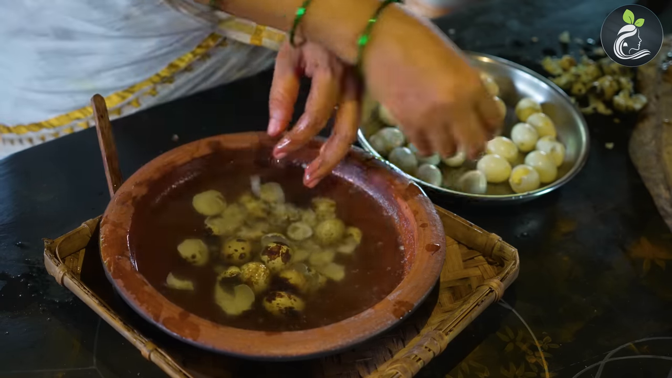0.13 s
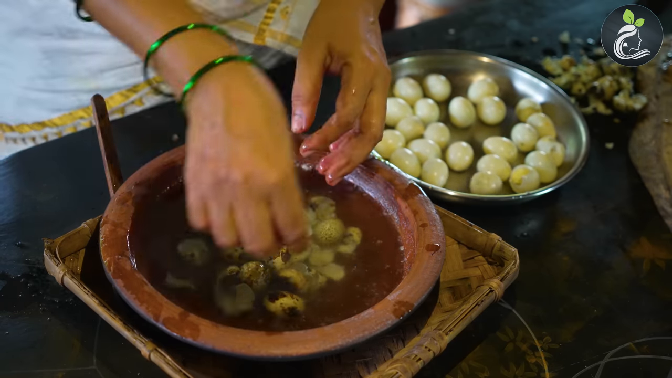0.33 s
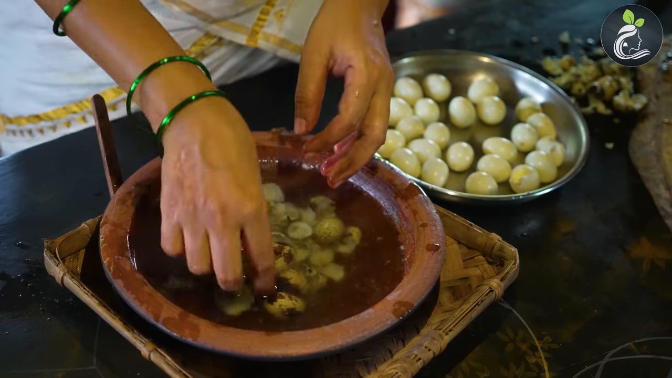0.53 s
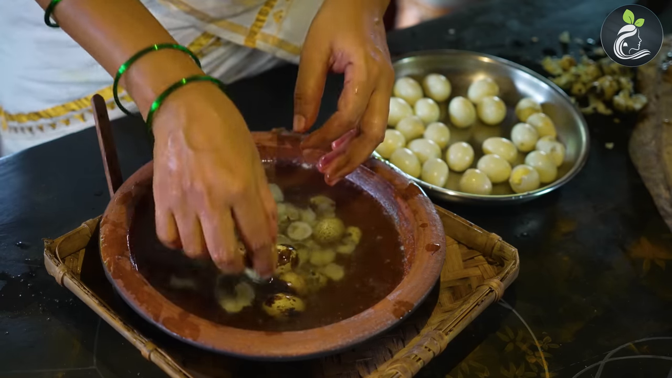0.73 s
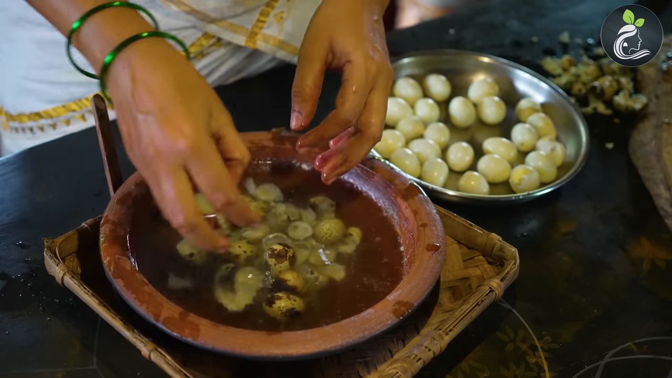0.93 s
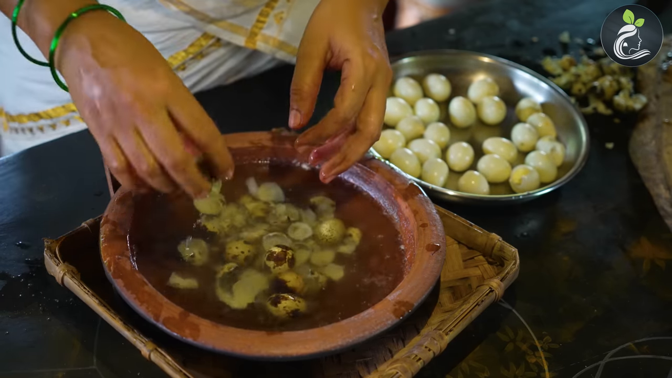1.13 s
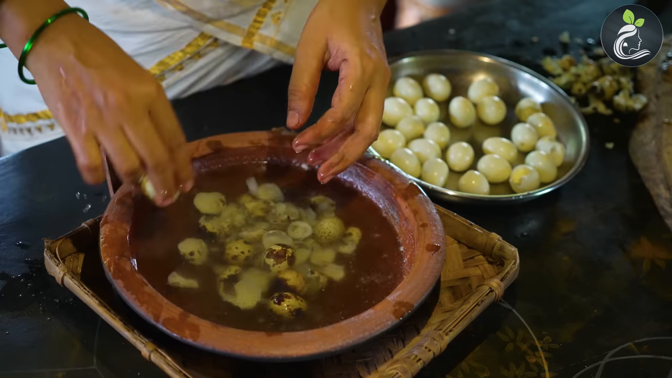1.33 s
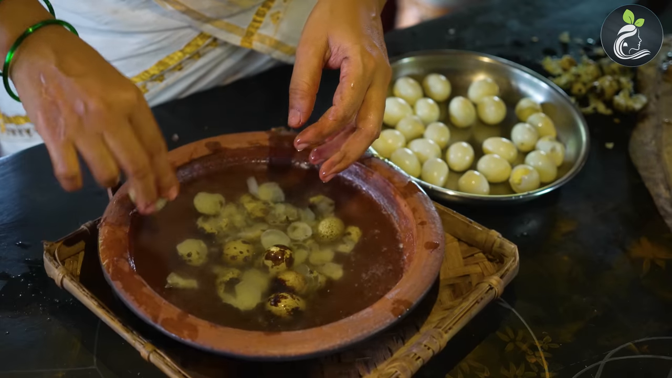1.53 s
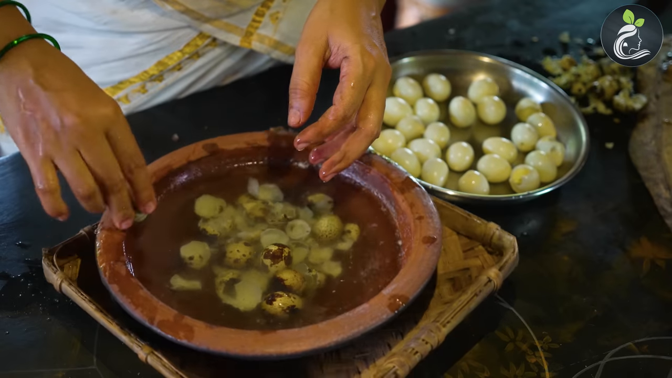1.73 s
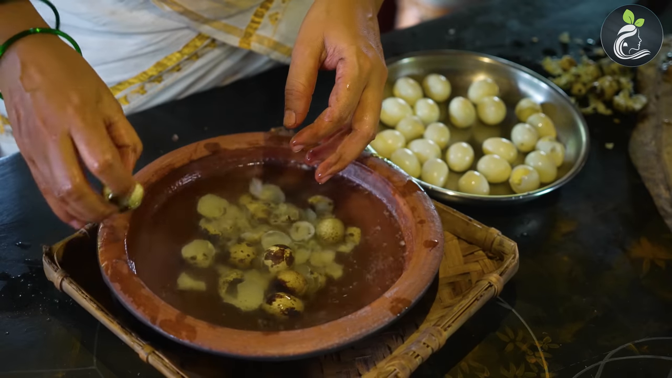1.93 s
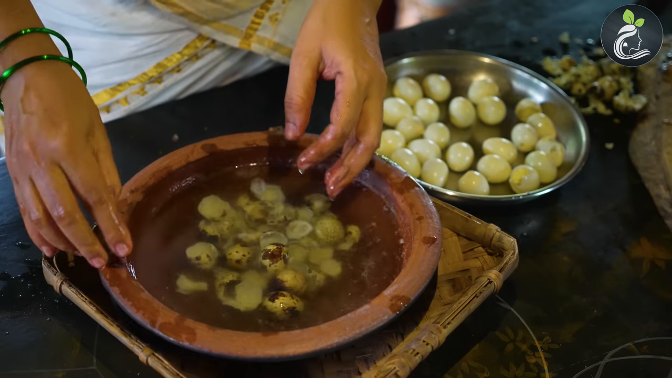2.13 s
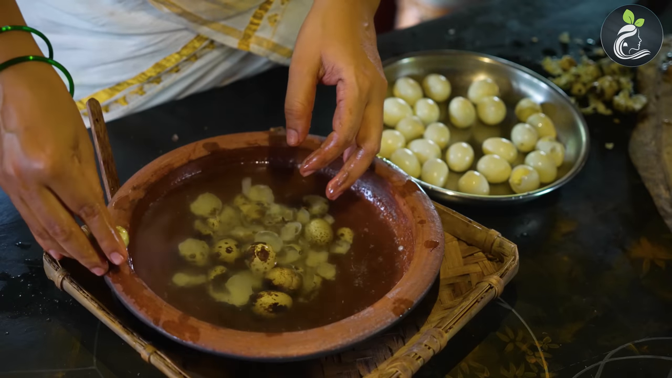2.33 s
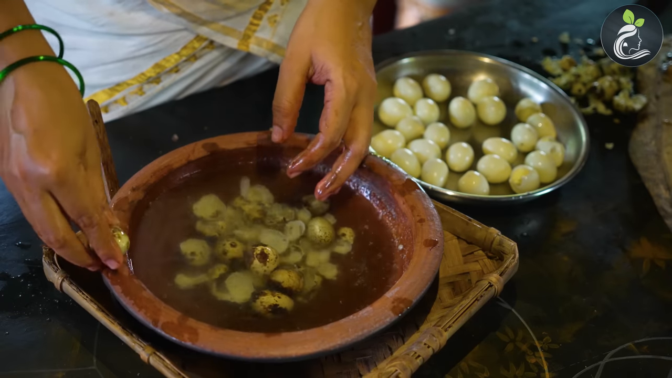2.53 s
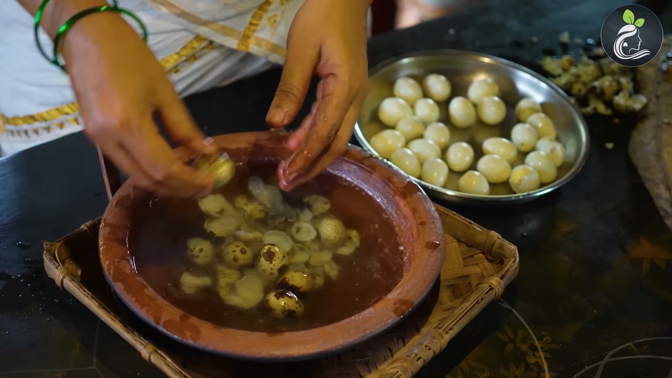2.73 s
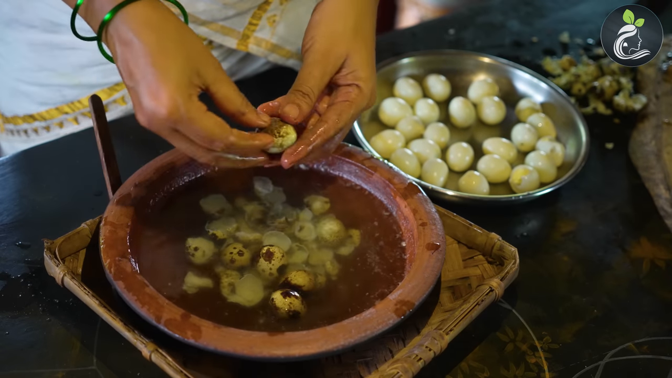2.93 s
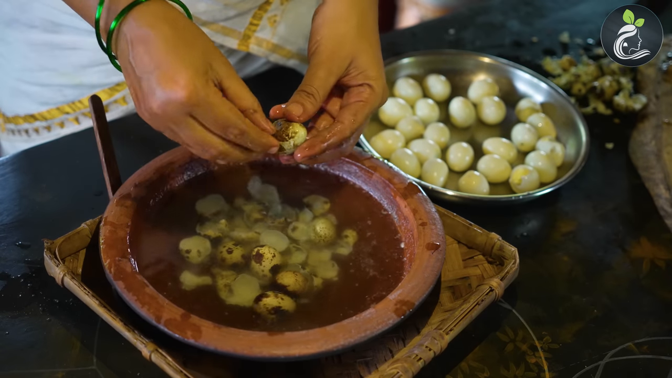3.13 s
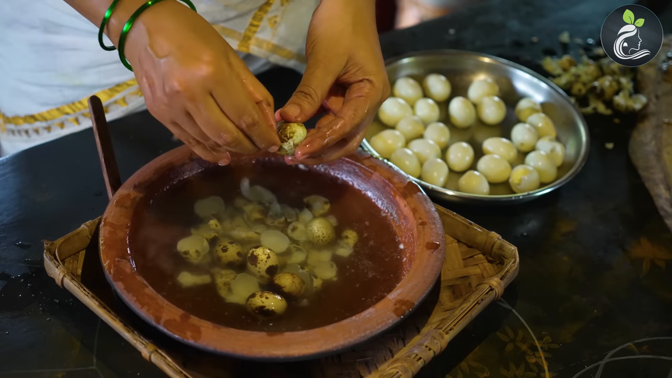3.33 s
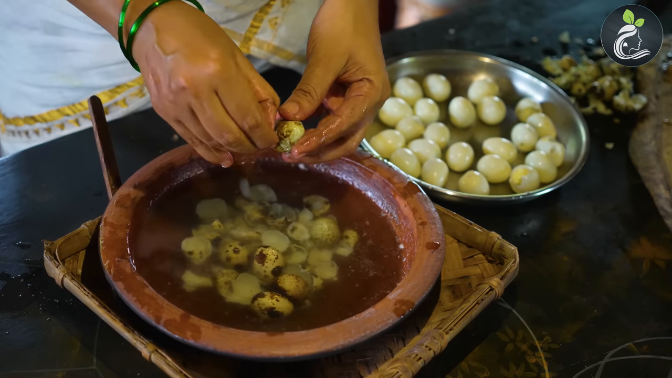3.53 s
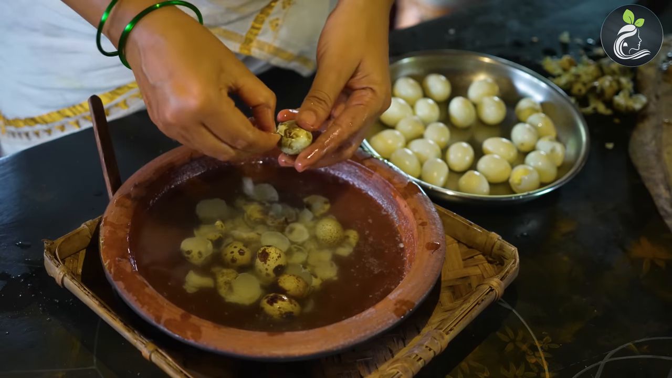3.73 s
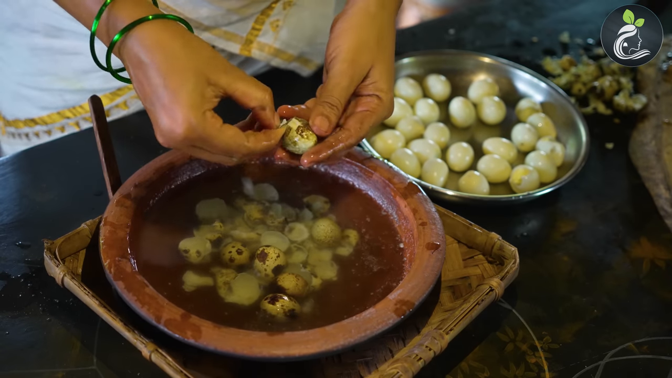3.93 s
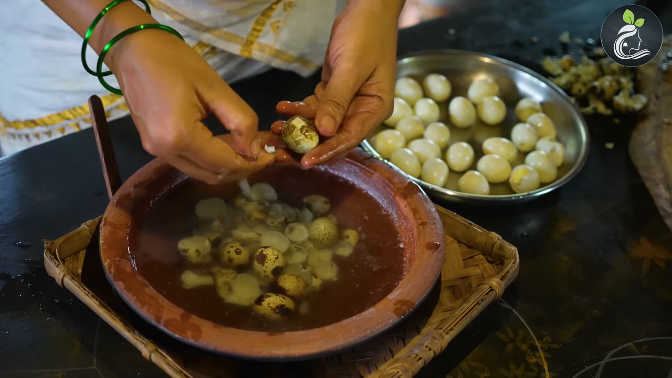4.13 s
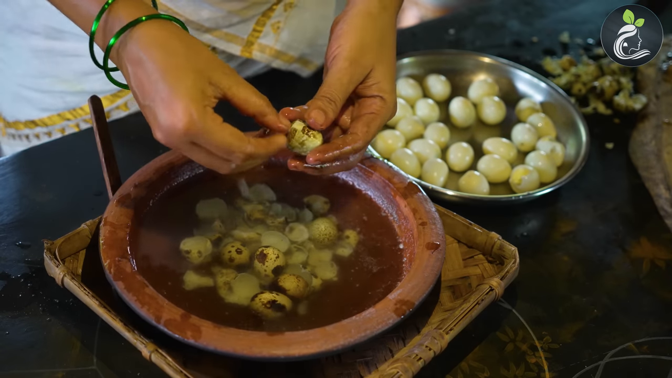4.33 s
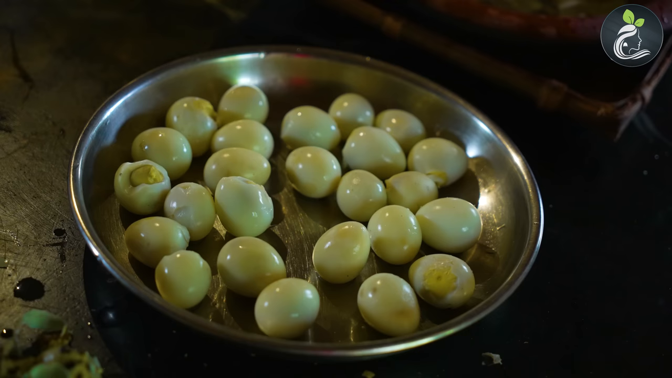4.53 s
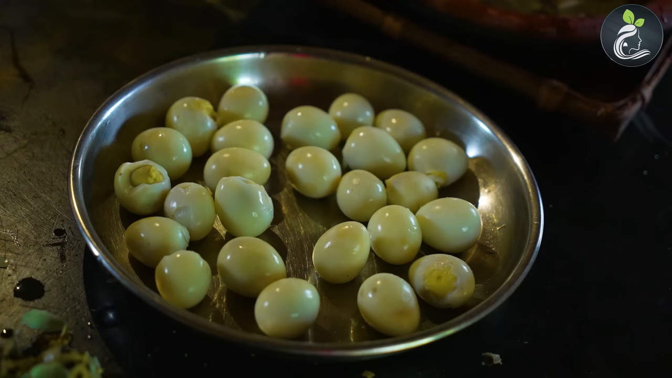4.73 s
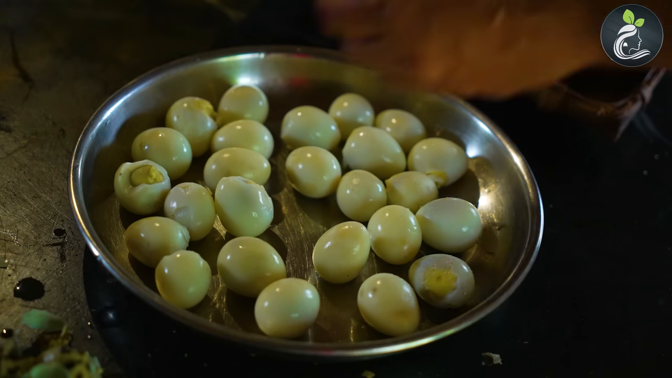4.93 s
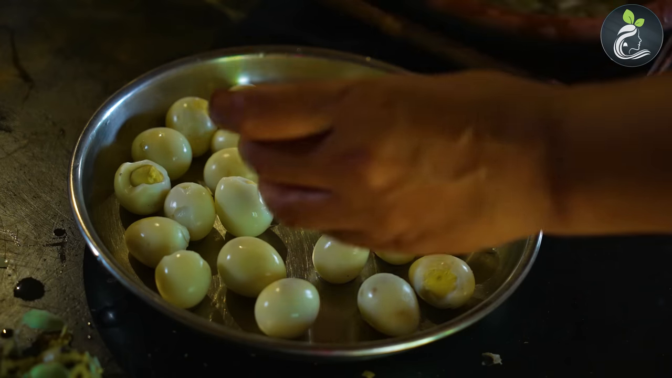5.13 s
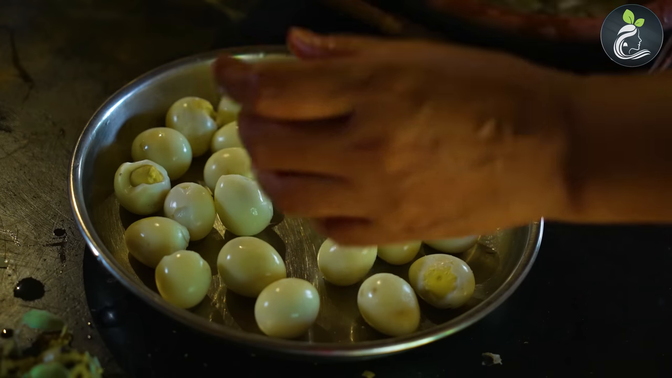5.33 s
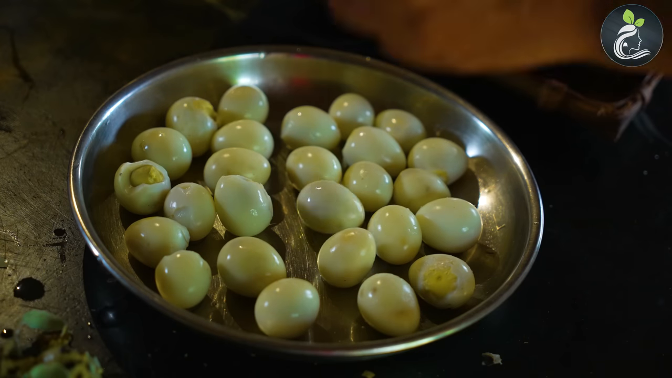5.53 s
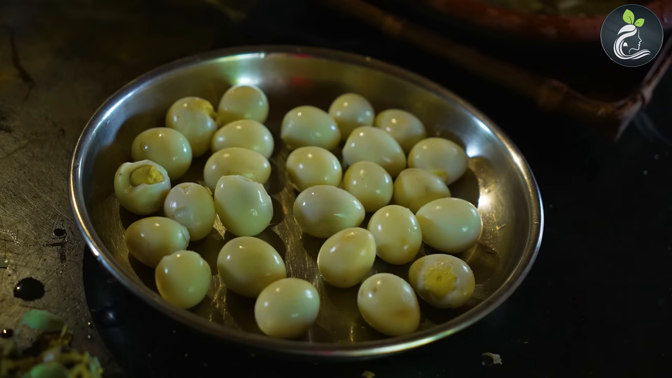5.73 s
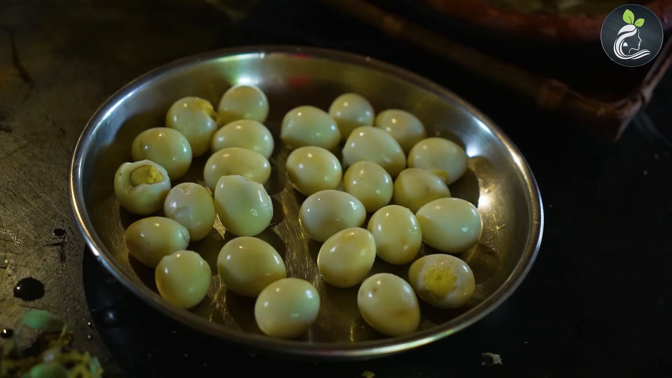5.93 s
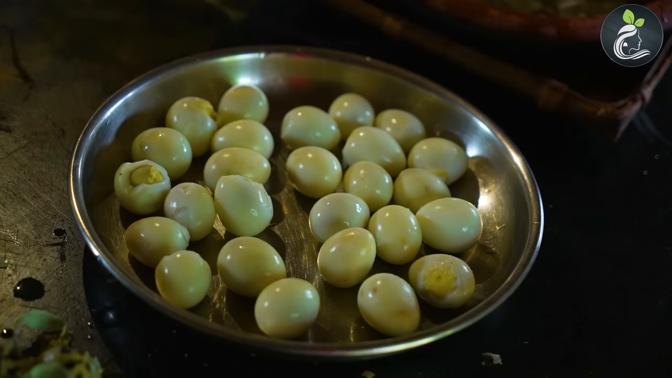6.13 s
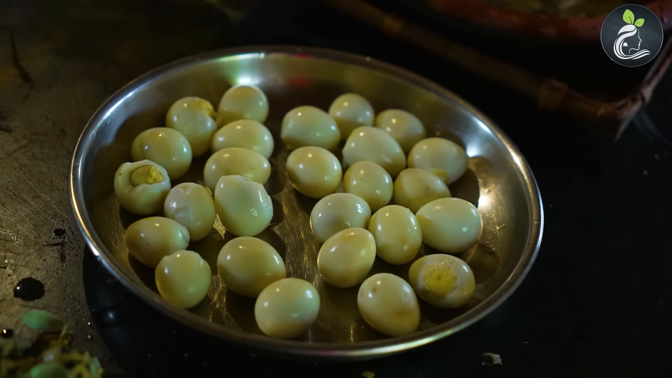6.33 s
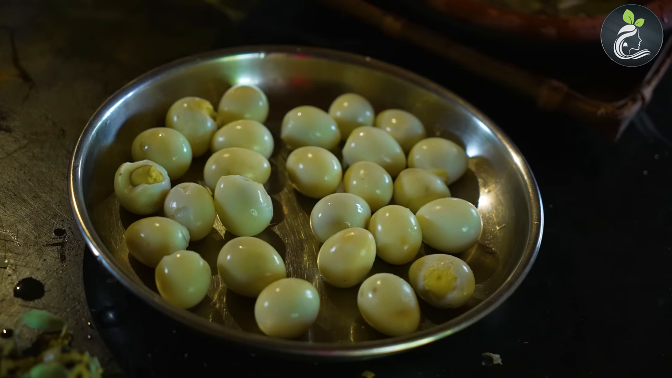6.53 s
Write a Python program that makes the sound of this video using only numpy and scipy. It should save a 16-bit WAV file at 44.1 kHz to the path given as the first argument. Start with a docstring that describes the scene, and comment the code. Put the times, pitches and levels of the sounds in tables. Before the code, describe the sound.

Close by in a kitchen, a small boiled egg knocks against a clay pot under water, then is tapped sharply on the rim four times and rolled until the shell crunches. Bits of shell tick and crumble, and glass bangles clink once. Then wet fingers squelch softly, setting eggs on a plate, and a few drops fall. Faint birds call outside over a steady hush.

```python
"""Boiled eggs are peeled by hand over a clay pot of water, with a steady hush and birds calling outside.
Wet fingers slide, bits of shell snap and crumble, and an egg knocks on the pot under water.
It gets four clear taps and two faint ones on the rim, each cracking shell and ringing the clay,
and is rolled until the shell gives way. A crow caws, more shell breaks and glass bangles touch once.
From about 4.5 s the hush is thinner; wet fingers squelch as they set eggs on a plate, and water drips."""
import sys
import numpy as np
from scipy import signal
from scipy.fft import rfft, irfft, next_fast_len
from scipy.io import wavfile

SR = 44100
rng = np.random.default_rng(int(sys.argv[2]) if len(sys.argv) > 2 else 0)


def unload_wav(signal):
    """Save mono or channel-first audio to the path in sys.argv[1] as 16-bit WAV at rate SR, clipped to [-1, 1]."""
    wavfile.write(
        sys.argv[1],
        SR,
        np.round(np.clip(np.atleast_2d(signal).T, -1, 1) * 32767).astype(np.int16),
    )


N = 291058
TIME = np.arange(N) / SR
AGE = TIME[:SR // 2]   # seconds since the start of one short sound


def from_db(db):
    """Turn decibels into a number to multiply a sound by."""
    return 10 ** (np.asarray(db) / 20)


def rms_one(x):
    """Scale a sound so that its average power is one."""
    return x / np.sqrt(np.mean(x ** 2) + 1e-20)


def at_hz(points, hz):
    """Read between the rows of a table of frequencies, giving each octave equal room."""
    row_hz, values = np.transpose(points)
    return np.interp(np.log(hz), np.log(row_hz), values)


def add(out, s, sound):
    """Mix a sound in, starting at s seconds."""
    start = round(s * SR)
    out[:, start:start + sound.shape[-1]] += sound[..., :N - start]


def pan(right_db):
    """Make the right ear right_db louder than the left."""
    return from_db([[-right_db / 2], [right_db / 2]])


def burst(rise_s, fade_s):
    """Loudness that climbs in a straight line, then dies away."""
    return np.minimum(AGE / rise_s, 1) * np.exp(-np.maximum(AGE - rise_s, 0) / fade_s)


def stereo_noise(colour_db, size=len(AGE), lag_s=0, mono_below_hz=220):
    """Noise shaped by colour_db(hz). The ears share the bass, not the treble; the right is lag_s late."""
    # how alike the two ears sound: f/Hz, likeness (1 = the same)
    likeness = [(300, 0.95), (600, 0.67), (1200, 0.37), (2500, 0.4), (5000, 0.21), (9000, 0)]
    padded = next_fast_len(size)
    hz = np.maximum(np.fft.rfftfreq(padded, 1 / SR), 1)
    middle, side = rfft(rng.standard_normal((2, padded)))
    alike = at_hz(likeness, hz)
    side = side * hz ** 2 / (hz ** 2 + mono_below_hz ** 2)
    ears = np.sqrt(1 + alike) * middle + np.sqrt(1 - alike) * side * [[1], [-1]]
    ears[1] *= np.exp(-2j * np.pi * hz * lag_s)
    return rms_one(irfft(ears * from_db(colour_db(hz)), padded)[:, :size])


def echoes(x, wet_db, t60, gap_s):
    """Add a wash of echoes after a short gap. Here and below, t60 is the seconds taken to fade 60 dB."""
    tail = rng.standard_normal((2, len(AGE))) * from_db(-60 * AGE / t60) * (AGE > gap_s)
    tail /= np.sqrt(np.sum(tail ** 2, axis=1, keepdims=True))
    return x + from_db(wet_db) * signal.fftconvolve(x, tail, axes=1)[:, :N]


def air(colour, peaks, swell_curve, lag_s, swell_depth=1.8):
    """Outdoor air: noise with a few narrow peaks, whose low-middle pitches swell and ebb."""
    def colour_db(hz):
        humps = sum(db * np.exp(-((hz - centre) / width) ** 2) for centre, width, db in peaks)
        return at_hz(colour, hz) + humps
    noise = stereo_noise(colour_db, N, lag_s)
    s, db = np.transpose(swell_curve)
    swell = from_db(swell_depth * np.interp(TIME, s, db - db.mean()))
    low_mids = signal.sosfilt(signal.butter(1, [270, 650], "band", fs=SR, output="sos"), noise)
    return noise + (swell - 1) * low_mids


def hush(move_s=4.495, level_db=-47.5):
    """The steady background; it turns thinner at move_s, when the work moves from pot to plate."""
    # tone colour of the air in each place: f/Hz, level/dB
    pot_colour = [(25, -21), (55, -6.5), (110, -12.5), (300, -13), (420, -4.5), (700, -2.5), (1300, 0),
                  (2200, -3), (3500, -4.5), (6000, -8), (9000, -5), (10800, -12.5), (16000, -15)]
    plate_colour = [(25, -22), (55, -12), (90, -6), (160, -21), (330, -24), (600, -11), (1100, -10),
                    (1800, -3.5), (2400, -8.5), (4500, -13), (8700, -10), (11000, -14), (16000, -16)]
    # narrow resonances by the pot: f/Hz, width/Hz, boost/dB
    pot_peaks = [(275, 24, 6.5), (967, 60, 3), (1447, 22, 6)]
    # shape of the swell in each place, which air() centres and deepens: t/s, level/dB
    pot_swell = [(0.0, -64), (0.49, -66.5), (3.39, -64.5), (4.3, -63.5)]
    plate_swell = [(4.9, -69), (6.6, -67)]
    hiss = [(8600, 800, 4)]   # one more peak, high up
    by_pot = air(pot_colour, pot_peaks + hiss, pot_swell, lag_s=0.00012) * pan(right_db=-1)
    by_plate = air(plate_colour, hiss, plate_swell, lag_s=0.00005) * pan(right_db=1.2)
    return from_db(level_db) * np.where(TIME < move_s, by_pot, by_plate)


def grain(spread_db, size=len(AGE), step=12):
    """The uneven strengths of tiny breaks, a new one every step samples."""
    strengths = from_db(spread_db * np.clip(rng.standard_normal(size // step + 2), -3, 2.5))
    return rms_one(np.interp(np.arange(size) / step, np.arange(len(strengths)), strengths))


def flakes(tilt_db, grain_db=2.5, size=len(AGE)):
    """A cluster of tiny breaks or wet clicks, made brighter by tilt_db per octave."""
    # tone colour before the tilt: f/Hz, level/dB
    colour = [(400, -20), (900, 4.5), (2000, -2), (4000, -0.5), (7000, 2.5), (11000, 2), (15500, -5.5)]
    noise = stereo_noise(lambda hz: at_hz(colour, hz) + tilt_db * np.log2(hz / 7000), size)
    return noise * grain(grain_db, size)


def slides():
    """Wet eggs and fingers slide, with a fine fizz that swells and ebbs with their speed."""
    # sliding strokes: t/s, length/s, level/dB, tilt/(dB per octave)
    strokes = [(0.015, 0.044, -50, 0.5), (0.502, 0.085, -48, -1.5), (4.479, 0.12, -50.5, 1.5),
               (5.38, 0.78, -49.5, -0.5), (5.642, 0.14, -50, 11)]
    out = np.zeros((2, N))
    for s, length, db, tilt_db in strokes:
        speed = np.sin(np.linspace(0, np.pi, round(length * SR)))
        add(out, s, from_db(db) * speed * flakes(tilt_db, grain_db=3, size=len(speed)))
    return out


def glide(hz, octaves, length):
    """A pitch that slides evenly through hz."""
    return hz * 2 ** (octaves * np.linspace(-0.5, 0.5, round(length * SR)))


def arch(hz, length, scoop, droop, scoop_s=0.0251, quaver_octaves=0.0145, quaver_per_s=22):
    """A pitch that scoops up to hz, wobbles there and droops at the end; scoop and droop are octaves."""
    age = TIME[:round(length * SR)]
    wobble = np.interp(age * quaver_per_s, np.arange(len(AGE)), rng.standard_normal(len(AGE)))
    octaves = quaver_octaves * wobble - scoop * np.exp(-age / scoop_s) - droop * (age / length) ** 6
    return hz * 2 ** octaves


def bird_note(pitch, hoarse_hz, clear, peak_at):
    """One note that swells and fades: a clear whistle plus a random shake that makes it hoarse."""
    progress = np.linspace(0, 1, len(pitch))
    phase = 2 * np.pi * np.cumsum(pitch) / SR
    noise = rng.standard_normal((2, len(AGE)))
    shake = signal.sosfilt(signal.butter(2, hoarse_hz, fs=SR, output="sos"), noise)
    shake = rms_one(shake)[:, -len(pitch):]
    tone = (clear + shake[0]) * np.cos(phase) + shake[1] * np.sin(phase)
    return rms_one(tone * progress ** peak_at * (1 - progress) ** (1 - peak_at))


def chirps(chatter_from_s=4.6, chatter_to_s=6.0, chatter_hz=3090):
    """Birds give short gliding chirps; later, small ones farther off chatter at random."""
    # single chirps: t/s, length/s, middle f/Hz, glide/octaves, relative level/dB
    notes = [(.125, .035, 3070, .08, -58), (0.652, 0.053, 2670, -.28, -50.5), (0.724, .055, 2480, .25, -55),
             (1.93, 0.04, 2760, -0.22, -50.5), (2.504, 0.055, 2406, 0.25, -47),
             (3.026, 0.056, 1874, 0.32, -52.5), (3.745, 0.07, 4140, 0.061, -60),
             (4.273, .07, 4130, -0.024, -64), (4.51, .06, 6750, .08, -55), (5.19, 0.06, 4040, 0.015, -58.5),
             (5.55, 0.054, 3100, .25, -58), (5.82, .06, 3270, .14, -57)]
    chatter = []
    for _ in range(12):
        s = rng.uniform(chatter_from_s, chatter_to_s)
        offset, octaves = rng.uniform(-0.25, 0.25, 2)
        chatter.append((s, 0.05, chatter_hz * 2 ** offset, octaves, -62))
    out = np.zeros((2, N))
    for s, length, hz, octaves, db in notes + chatter:
        pitch = glide(hz, octaves, length)
        add(out, s, from_db(db) * bird_note(pitch, hoarse_hz=45, clear=1.6, peak_at=0.6))
    return out


def ticks():
    """Very short, bright ticks: shell flakes snapping, and at 3.6 s the click of bangles touching."""
    # ticks of shell or glass: t/s, level/dB
    clicks = [(0.192, -33), (1.969, -34), (2.866, -31), (3.1875, -29), (3.601, -28), (3.9325, -33),
              (3.974, -24.5), (4.888, -36)]
    out = np.zeros((2, N))
    for s, db in clicks:
        bright = stereo_noise(lambda hz: 6.5 * np.log2(hz))
        add(out, s, from_db(db) * bright * burst(rise_s=0.0002, fade_s=0.0005))
    return echoes(out, wet_db=-9, t60=0.08, gap_s=0.002) * pan(right_db=-10)


def crumbles():
    """A patch of shell crumbles between the fingers in many tiny breaks."""
    # crumbling patches: t/s, level/dB
    patches = [(0.383, -39.5), (3.548, -37)]
    out = np.zeros((2, N))
    for s, db in patches:
        add(out, s, from_db(db) * flakes(tilt_db=3) * burst(rise_s=0.012, fade_s=0.024))
    return out * pan(right_db=3.5)


def noise_band(centre_hz, octaves):
    """Noise in a band around one pitch."""
    low_hz, high_hz = centre_hz / 2 ** (octaves / 2), centre_hz * 2 ** (octaves / 2)
    return stereo_noise(lambda hz: -10 * np.log10((1 + (low_hz / hz) ** 8) * (1 + (hz / high_hz) ** 6)))


def bumps():
    """Hand, water and pot meet softly in short, dull thuds; deeper ones last longer."""
    # soft contacts: t/s, level/dB, centre f/Hz, width/octaves
    contacts = [(0.539, -52, 300, 2), (0.9332, -40, 410, 2.4), (.933, -45, 1400, 2.8),
                (0.94, -42.5, 58, 2.9), (1.846, -49.5, 121, 0.72), (1.88, -48.5, 62, 1.6),
                (2.589, -43, 300, 2.4), (2.745, -49, 250, 2.3), (3.235, -56.5, 110, 2.9)]
    out = np.zeros((2, N))
    for s, db, hz, octaves in contacts:
        fade_s = 0.03 * (300 / hz) ** 0.17
        add(out, s, from_db(db) * noise_band(hz, octaves) * burst(0.00092, fade_s))
    return out


def ring(tones, ear_spread, rise_cycles=2.6):
    """A struck object's own tones build up and fade, out of step at the ears by +-ear_spread radians."""
    out = 0
    for hz, db, t60 in tones:
        phase = rng.uniform(0, 2 * np.pi) + ear_spread * rng.choice([-1, 1]) * np.array([[1], [-1]])
        loudness = from_db(db - 60 * AGE / t60) * np.minimum(AGE * hz / rise_cycles, 1)
        out = out + loudness * np.sin(2 * np.pi * hz * AGE + phase)
    return out


def strikes(blows, tones, ear_spread):
    """Light blows set one object ringing."""
    out = np.zeros((2, N))
    for s, db in blows:
        add(out, s, from_db(db) * ring(tones, ear_spread))
    return echoes(out, wet_db=-14, t60=0.16, gap_s=0.0041)


def underwater_knocks():
    """An egg knocks against the pot under water as it is fished out."""
    # knocks: t/s, level/dB
    blows = [(.5613, -29), (.5722, -31)]
    # tones they ring: f/Hz, relative level/dB, t60/s
    tones = [(1184, -10, 0.092), (1320, -0.5, 0.054), (1390, 2.5, 0.025), (1630, -11, 0.067),
             (1735, -9.5, 0.077), (2294, -11, 0.07)]
    return strikes(blows, tones, ear_spread=0.3)


def squawks():
    """A bird squawks: a hoarse falling note with a wider rasp around it."""
    # squawks: t/s, middle f/Hz, relative level/dB
    notes = [(1.107, 2910, -58.5), (2.145, 2677, -46), (6.51, 2757, -57)]
    out = np.zeros((2, N))
    for s, hz, db in notes:
        pitch = glide(hz, octaves=-0.1004, length=0.095)
        add(out, s, from_db(db) * bird_note(pitch, hoarse_hz=130, clear=0.98, peak_at=0.52))
        add(out, s, from_db(db + 2.5) * bird_note(pitch, hoarse_hz=750, clear=0, peak_at=0.36))
    return out


def egg_on_rim(tap_crush_s=0.0026, roll_crush_s=0.01, roll_from_deg=124, roll_deg_per_s=1500):
    """Each tap or step of the roll crushes shell and rings the pot; the spot hit favours some tones."""
    # taps: t/s, ring level/dB, spot on the rim/degrees, crack level/dB, ring to the right/dB
    taps = [(1.3453, -22, 5, -18, 1), (1.5509, -22, 105, -18, 2), (1.671, -48.5, 330, -41, -1),
            (1.7506, -31, 338, -26, 1), (1.98, -45, 300, -38, 1), (2.1264, -22.5, 265, -22.8, 2)]
    # the shell giving way in steps as the egg rolls: t/s, level/dB
    roll = [(2.264, -42), (2.282, -30.5), (2.293, -30.5), (2.305, -37), (2.3243, -34), (2.337, -35.5),
            (2.387, -46)]
    # the clay pot's tones: f/Hz, relative level/dB, t60/s, loudest spot/degrees, swing round the rim/dB
    pot = [(1008, -14, 0.11, 154, 3.5), (1252, -13.5, 0.076, 240, 5), (1393, -9, 0.029, 240, 2.5),
           (1673, -4, 0.054, 57, 2.5), (1778, -3.5, 0.047, 0, 4.5), (1860, -7.5, 0.11, 268, 6),
           (2367, -9, 0.057, 60, 1), (2785, -10, 0.097, 0, 6), (2920, -15, 0.12, 224, 7),
           (2990, -17, 0.13, 320, 0), (3270, -16.5, 0.059, 328, 7), (4043, -1, 0.076, 153, 5),
           (4810, -4.5, 0.031, 67, 3.5), (5210, -3.5, 0.043, 67, 6.5), (5400, -21, .1, 120, 6),
           (6700, -7, 0.016, 30, 5)]
    # tone colour of breaking shell: f/Hz, level/dB
    crack_colour = [(400, -40), (900, -3.5), (3500, 0), (7000, 1), (10000, 0), (12500, -4), (15500, -6.5)]
    hits = [(s, db, spot, crack_db, right_db, tap_crush_s, 0) for s, db, spot, crack_db, right_db in taps]
    for s, db in roll:
        spot = roll_from_deg + roll_deg_per_s * (s - roll[0][0])
        hits.append((s, db, spot, db - 3, 1, roll_crush_s, 10))
    rings, cracks = np.zeros((2, 2, N))
    pressed = 1 + 0.3 * burst(0.0022, 0.0028)   # the egg drives the clay, then damps it as it rests
    for s, ring_db, spot, crack_db, right_db, crush_s, fall_db in hits:
        tones = []
        for hz, db, t60, best_spot, swing_db in pot:
            spot_db = swing_db * np.cos(np.radians(spot - best_spot))
            loss_db = fall_db * abs(np.log2(hz / 3000))   # rolling mostly rings tones near 3000 Hz
            tones.append((hz, ring_db + db + spot_db - loss_db, t60))
        add(rings, s, ring(tones, ear_spread=0.43) * pressed * pan(right_db))
        for lag_s, db in (0, 0), (0.0031, -6.5):   # the shell breaks, then gives way once more
            shell = stereo_noise(lambda hz: at_hz(crack_colour, hz)) * grain(spread_db=2.5)
            crack = from_db(crack_db + db) * shell * burst(0.00037, crush_s)
            add(cracks, s + lag_s, crack * pan(right_db / 2))
    rings = echoes(rings, wet_db=-10.5, t60=0.17, gap_s=0.005)
    return rings + echoes(cracks, wet_db=0, t60=0.16, gap_s=0.0052)


def whistles():
    """Birds hold long, wobbling whistles that droop at the end."""
    # whistles: t/s, length/s, held f/Hz, scoop/octaves, relative level/dB
    notes = [(2.545, 0.096, 1860, 0.023, -56.5), (2.56, 0.15, 2494, 0, -55), (3.07, 0.14, 1745, .2, -57),
             (3.085, .27, 2262, 0.087, -57), (4.72, .36, 1830, 0.032, -60), (5.46, 0.33, 1803, 0.039, -54)]
    out = np.zeros((2, N))
    for s, length, hz, scoop, db in notes:
        pitch = arch(hz, length, scoop, droop=0.193)
        add(out, s, from_db(db) * bird_note(pitch, hoarse_hz=34, clear=2.6, peak_at=0.55))
    return out


def crow(start_s=2.817, relative_db=-47):
    """A crow caws once: a stack of hoarse tones, all multiples of one low pitch."""
    # tones of the caw: multiple of the pitch, relative level/dB
    harmonics = [(4, -7), (5, -7), (6, -1.5), (7, -10), (8, -9), (10, -11)]
    pitch = arch(hz=360, length=0.115, scoop=0.042, droop=0)
    out = np.zeros((2, N))
    for multiple, db in harmonics:
        tone = bird_note(multiple * pitch, hoarse_hz=110, clear=0.88, peak_at=0.25)
        add(out, start_s, from_db(relative_db + db) * tone)
    return out


def squelches(firm_db=-38.5, fizz_lag_s=0.0055):
    """Wet fingers touch or leave an egg: a smack, then a brighter fizz."""
    # finger touches: t/s, level/dB
    touches = [(3.188, -53), (4.62, -51), (4.681, -44.5), (4.783, -47), (4.825, -44), (4.8862, -40),
               (5.305, -46), (6.06, -44.5), (6.219, -35), (6.2541, -35), (6.3236, -36.5)]
    out = np.zeros((2, N))
    for s, db in touches:
        extra_tilt = 0.074 * (firm_db - db)   # a lighter touch is brighter
        smack = flakes(tilt_db=2 + extra_tilt) * burst(rise_s=0.00076, fade_s=0.019)
        fizz = flakes(tilt_db=6.5 + extra_tilt) * burst(rise_s=0.0025, fade_s=0.015)
        add(out, s, from_db(db) * smack)
        add(out, s + fizz_lag_s, from_db(db + 2.5) * fizz)
    return out


def bangles():
    """Glass bangles touch once and ring very high."""
    # the clink: t/s, level/dB
    blows = [(3.602, -40.5)]
    # tones of the glass: f/Hz, relative level/dB, t60/s
    tones = [(7650, 5, 0.082), (8635, -4.5, 0.11), (10120, 1.5, 0.1), (12740, 0, 0.12), (13900, 2, .14),
             (15450, -6, .1)]
    return strikes(blows, tones, ear_spread=0.73) * pan(right_db=-1)


def drips(climb_per_s=16):
    """A drop splashes and traps a bubble, whose pitch climbs as it rings out."""
    # drops: t/s, level/dB, starting f/Hz, t60/s
    drops = [(4.651, -45.5, 2640, .025), (5.984, -33.5, 2130, 0.034), (6.428, -42, 3800, 0.032)]
    out = np.zeros((2, N))
    for s, db, hz, t60 in drops:
        phase = 2 * np.pi * hz * (AGE + climb_per_s * AGE ** 2 / 2)
        bubble = from_db(db - 60 * AGE / t60) * np.sin(phase)
        splash = from_db(db - 3) * noise_band(hz, octaves=0.82) * burst(rise_s=0.001, fade_s=0.0026)
        add(out, s, bubble + splash)
    return echoes(out, wet_db=-8, t60=0.059, gap_s=0.004)


def scene(bird_distance_db=-2.5):
    """The kitchen work is close by; behind it are the air and birds, softened and blurred by distance."""
    fingers = slides() + crumbles() + squelches()
    fingers = echoes(fingers, wet_db=-4, t60=0.17, gap_s=0.005) * pan(right_db=1.7)
    birds = chirps() + squawks() + whistles() + crow()
    birds = from_db(bird_distance_db) * echoes(birds, wet_db=-2.5, t60=0.35, gap_s=0.012)
    work = fingers + ticks() + bumps() + underwater_knocks() + egg_on_rim() + bangles() + drips()
    return hush() + birds + work


def record(dry, low_cut_hz=23, high_cut_hz=16100):
    """The microphone loses the deepest rumble, and the highest treble is cut off steeply."""
    thinned = signal.sosfilt(signal.butter(2, low_cut_hz, "high", fs=SR, output="sos"), dry)
    return signal.sosfilt(signal.ellip(10, 0.2, 70, high_cut_hz, fs=SR, output="sos"), thinned)


dry = scene()
out = record(dry)
unload_wav(out)
```